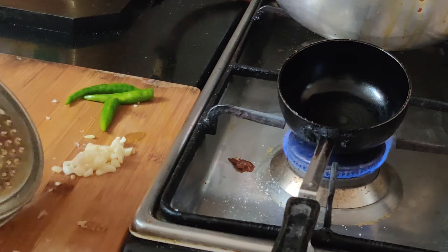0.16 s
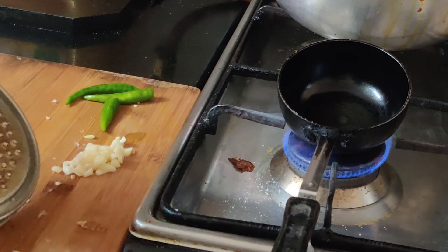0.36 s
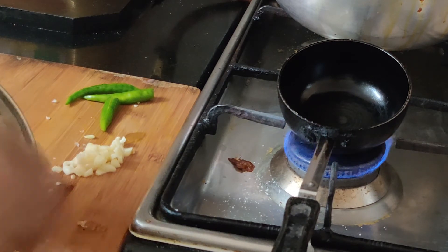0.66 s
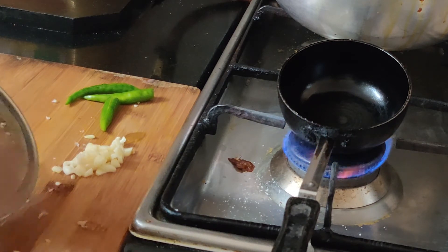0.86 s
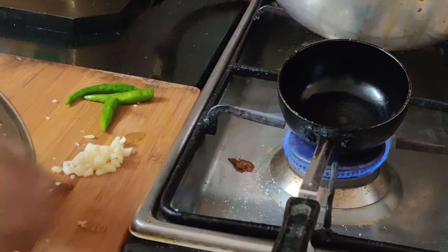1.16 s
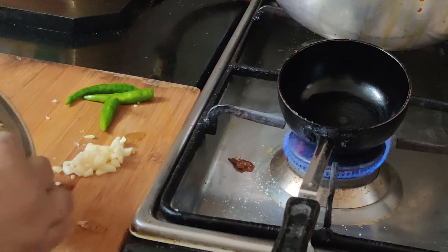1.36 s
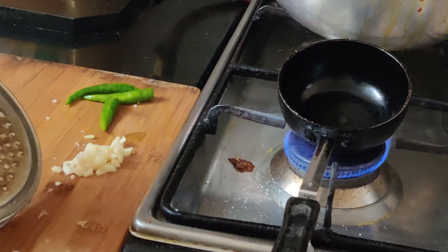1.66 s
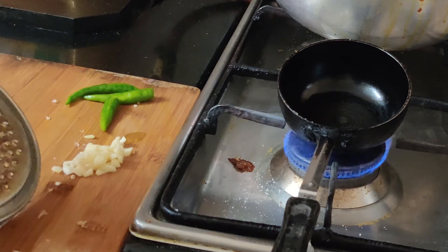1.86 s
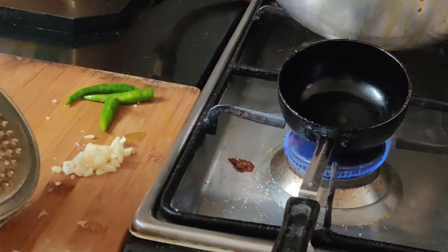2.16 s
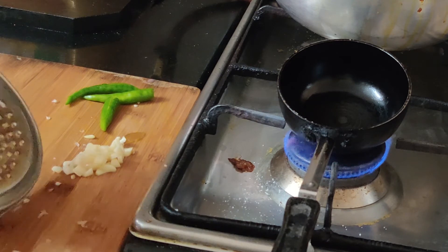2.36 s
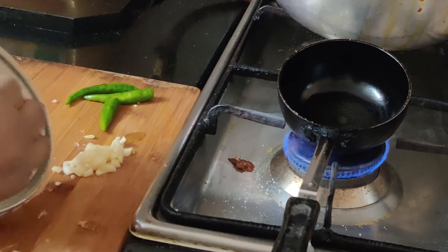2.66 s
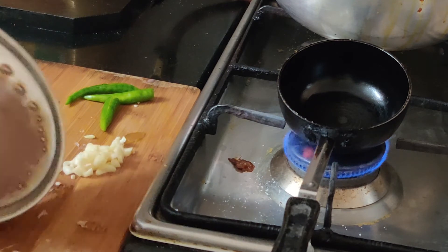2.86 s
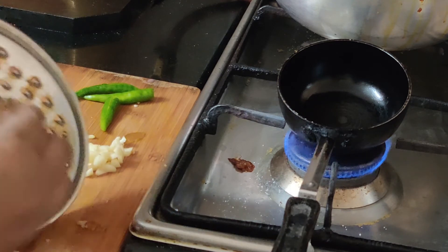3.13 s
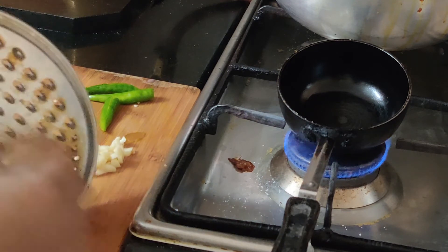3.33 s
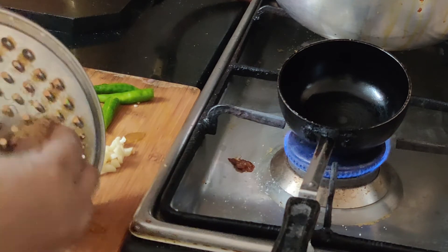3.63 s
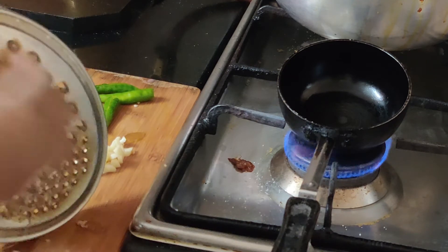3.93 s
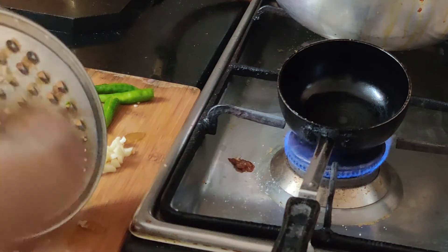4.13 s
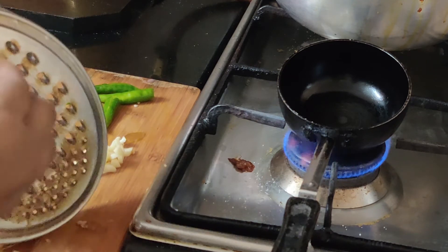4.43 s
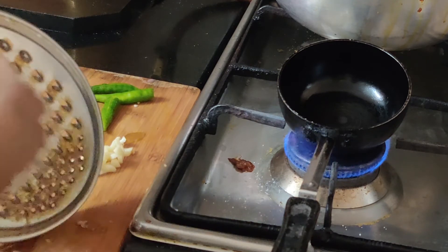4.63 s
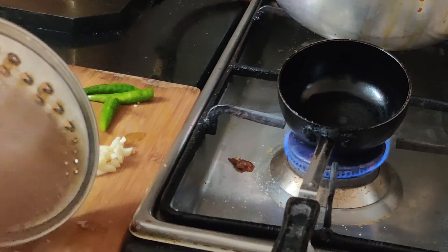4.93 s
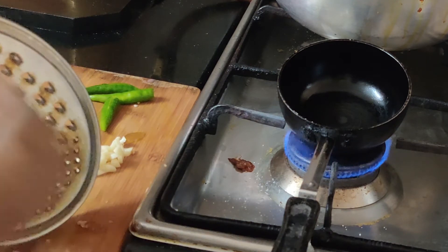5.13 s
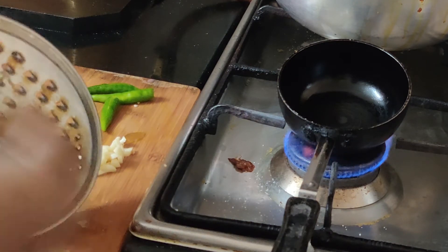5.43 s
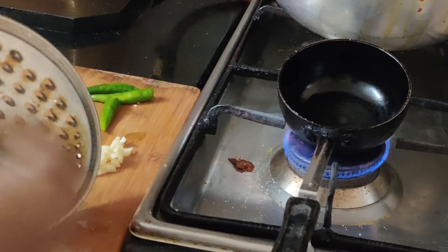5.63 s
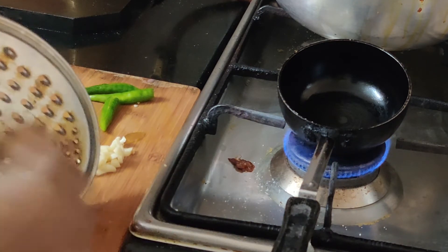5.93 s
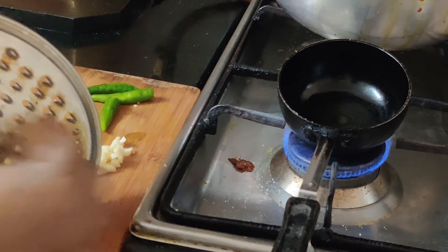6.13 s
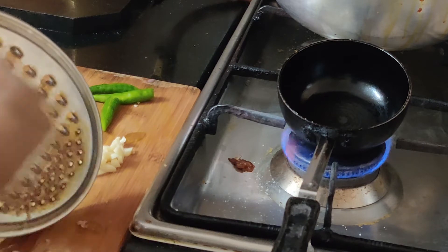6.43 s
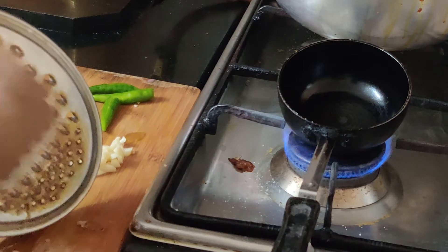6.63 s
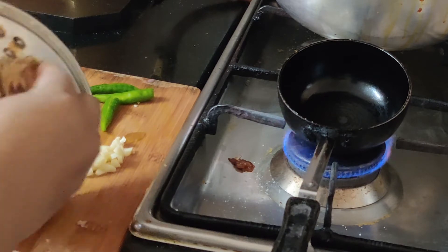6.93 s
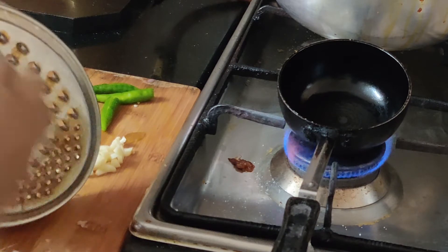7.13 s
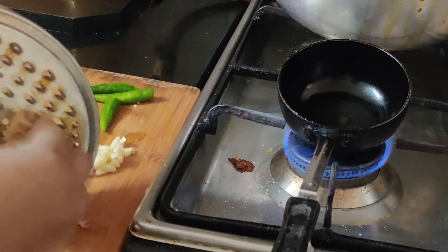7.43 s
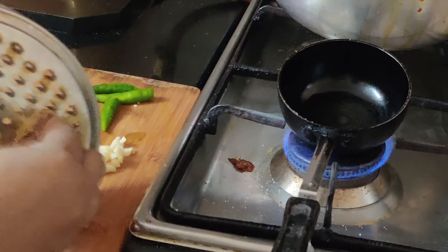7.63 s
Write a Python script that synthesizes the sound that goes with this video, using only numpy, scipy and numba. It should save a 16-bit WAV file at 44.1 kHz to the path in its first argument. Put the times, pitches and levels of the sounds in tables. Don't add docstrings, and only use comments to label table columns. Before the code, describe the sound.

Steam blasts steadily from a pressure cooker in a small tiled kitchen, heard close in stereo. The hiss is dense, bright and sharp, with a breathy whistle near 5 kHz leaning left and wandering slightly in pitch. It is already going at the start and never stops. A gas flame rumbles very faintly underneath.

```python
import sys
import numpy as np
from scipy import signal
from scipy.fft import rfft, irfft, next_fast_len
from scipy.io import wavfile
from scipy.ndimage import uniform_filter1d
from numba import njit

SR = 44100
rng = np.random.default_rng(int(sys.argv[2]) if len(sys.argv) > 2 else 0)


def decibels_to_gain(level_db):
    exponent = np.asarray(level_db, float) / 20
    return 10 ** exponent


def log_audio(samples):
    frames = np.atleast_2d(samples).T
    limited = np.clip(frames, -1, 1)
    pcm = np.round(limited * 32767).astype(np.int16)
    wavfile.write(sys.argv[1], SR, pcm)


N = 343539
SIZE = next_fast_len(N + SR)
HZ = np.arange(SIZE // 2 + 1) * SR / SIZE


def cooker():
    # frequency in Hz, level in dB per Hz.
    left_hiss = [(900, -27.2), (1500, -21.4), (2200, -17.3), (3000, -10.6), (3700, -5.5), (4200, -5.9),
                 (6200, -9.2), (7000, -8.2), (8000, -6.7), (9500, -7.9), (11000, -11.3), (13000, -17.4),
                 (14500, -15.8), (15700, -12.7)]
    right_hiss = [(900, -25.4), (1500, -22.5), (2200, -18.9), (3200, -11.8), (4100, -11.0), (5000, -3.7),
                  (6000, 0.9), (7200, -1.5), (8700, -1.6), (10000, -3.1), (11200, -10.4), (13200, -16.2),
                  (14500, -12.7), (15700, -9.5)]
    # frequency in Hz, width in Hz, level in dB.
    left_rings = [(3714, 26, 3.8), (4408, 66, 3.9), (4613, 22, 3.0), (4699, 20, 3.0), (4774, 17, 2.0),
                  (4807, 20, 1.8), (4871, 20, 2.9), (5038, 74, 3.2), (5130, 31, 5.1), (5205, 42, 1.6),
                  (5334, 16, 1.7), (5469, 47, 5.8), (5512, 13, 2.9), (5539, 20, 2.9), (5679, 43, 2.4),
                  (6486, 25, 3.7), (7725, 60, 3.8), (7865, 20, 3.8), (7940, 15, 3.3), (7988, 23, 3.6),
                  (8058, 20, 2.9), (8613, 34, 2.7), (8683, 18, 3.1), (8936, 35, 3.5)]
    right_rings = [(4984, 12, 3.0), (5022, 79, 4.0), (5092, 43, 2.9), (5264, 61, 3.2), (5485, 55, 2.8),
                   (5609, 31, 4.0), (5792, 20, 3.7), (5840, 26, 3.0), (6072, 40, 5.8), (6163, 66, 6.6),
                   (6438, 39, 6.5), (6486, 28, 4.4), (6556, 15, 3.2), (6653, 35, 3.1), (6739, 34, 4.8),
                   (6804, 29, 3.7), (7380, 83, 3.3), (7423, 28, 2.9), (7633, 25, 3.8), (7665, 13, 3.5),
                   (8301, 28, 4.1), (8704, 95, 5.0), (8947, 20, 3.5), (8984, 59, 3.8)]
    hiss_port_db, whistle_port_db = (2.3, 6.2), (4.5, -18)
    haze_db = -8

    hiss_db, whistle_db, whistle_hz, spray_db, rush_db, width_hz = flow()
    bands = flicker(spray_db - np.mean(spray_db), rush_db - np.mean(rush_db))
    tone = np.array([colour(left_hiss), colour(right_hiss)])
    ring = np.array([rings(left_rings), rings(right_rings)])

    smooth = decibels_to_gain(haze_db) * np.sqrt(1 + (HZ / 13000) ** 4)
    haze = [smooth * np.array([[1], [0]]), smooth * np.array([[0], [1]])]
    ring = ring / np.sqrt(1 + smooth ** 2)
    paths = [kitchen(), kitchen(), kitchen()] + haze

    shades = decibels_to_gain([2.5 * walk(.5), 2.5 * walk(.5), 2.5 * walk(.5)])
    shades = list(shades / np.sqrt(np.sum(shades ** 2, axis=0))) + [1, 1]

    hiss, whistle = 0, 0
    for shade, path in zip(shades, paths):
        jet = turbulence(bands)
        sung = vent_cavity(jet, whistle_hz, width_hz) * decibels_to_gain(hiss_db + whistle_db)
        hiss_spectrum = rfft(jet * decibels_to_gain(hiss_db), SIZE) * tone
        hiss = hiss + shade * irfft(hiss_spectrum * ring * path, SIZE)[:, :N]
        whistle = whistle + shade * irfft(rfft(sung, SIZE) * ring * path, SIZE)[:, :N]

    ports = []
    for port in (0, 1):
        hiss_part = decibels_to_gain(hiss_port_db[port]) * unit(hiss[port])
        whistle_part = decibels_to_gain(whistle_port_db[port]) * unit(whistle[port])
        ports.append(hiss_part + whistle_part)
    return decibels_to_gain(np.mean(hiss_db)) * np.array(ports)


def flow():
    # time in seconds, hiss level in dB, whistle frequency in Hz.
    flow_points = [(0.0, -20, 4900), (1.69, -20, 4850), (1.71, -21, 4864), (2.93, -19.5, 4955),
                   (3.12, -18, 4810), (3.21, -20.5, 4960), (3.34, -19.5, 4900), (3.97, -20, 5010),
                   (5.27, -19.5, 4920), (5.34, -20, 4970), (6.03, -21, 4940), (6.14, -21, 4900),
                   (6.2, -20, 4950), (7.79, -20, 4923)]
    t = np.arange(N) / SR
    s, hiss_db, whistle_hz = np.transpose(flow_points)

    widest_s, widest_hz, spread_hz_per_s, focus_hz_per_s = 3.9, 580, 27, 53
    narrowing_hz_per_s = np.where(t < widest_s, spread_hz_per_s, focus_hz_per_s)
    width_hz = widest_hz - narrowing_hz_per_s * np.abs(t - widest_s)
    whistle_db = 1.76 * (widest_hz - width_hz) / 100

    spray_fade_db_per_s, rush_extra_db, rush_settle_s = 0.18, 3.5, 1.4
    spray_db = -spray_fade_db_per_s * t
    rush_db = rush_extra_db * np.exp(-t / rush_settle_s)
    return np.interp(t, s, hiss_db), whistle_db, np.interp(t, s, whistle_hz), spray_db, rush_db, width_hz


def flicker(spray_db, rush_db):
    swell_db = .55 * walk(8)
    edges_hz = (0, 1500, 2400, 4300, 6000, 8000, 11000, 13500, SR)
    own_db = [1.2 * walk(6), 1.2 * walk(6), rush_db + .8 * walk(5), 0, 0, 0,
              spray_db + .9 * walk(10), spray_db + .9 * walk(10)]
    bands = []
    for lo_hz, hi_hz, db in zip(edges_hz[:-1], edges_hz[1:], own_db):
        bands.append((lo_hz, hi_hz, decibels_to_gain(swell_db + db + .5 * walk(14))))
    return bands


def turbulence(bands):
    noise = rfft(rng.standard_normal(SIZE))
    jet = 0
    for lo_hz, hi_hz, gain in bands:
        inside = (HZ >= lo_hz) & (HZ < hi_hz)
        jet = jet + gain * irfft(noise * inside, SIZE)[:N]
    return jet


def vent_cavity(jet, hz, width_hz):
    core_hz = 4945 + 1.3 * (hz - 4945)
    core_width_hz = 1.15 * width_hz
    core = svf(svf(jet, core_hz, core_width_hz), core_hz, core_width_hz)
    core = core * np.sqrt(500 / width_hz)
    shoulder_hz, shoulder_width_hz = 1.02 * hz, 0.33 * hz
    shoulder = svf(svf(jet, shoulder_hz, shoulder_width_hz), shoulder_hz, shoulder_width_hz)
    return core + 0.26 * shoulder


@njit
def svf(x, hz, width):
    y, band, low = np.empty(len(x)), 0., 0.
    for i in range(len(x)):
        g = np.tan(np.pi * hz[i] / SR)
        k = width[i] / hz[i]
        v = (band + g * (x[i] - low)) / (1 + g * (g + k))
        band = 2 * v - band
        low = low + 2 * g * v
        y[i] = k * v
    return y


def kitchen():
    t60_s, echo_db = .45, 2
    left_lag = 8.02
    t = np.arange(SR // 2) / SR
    decay = np.exp(-np.log(1000) * t / t60_s) * (t > .004)
    tail = rng.standard_normal((2, len(t))) * decay
    tail = decibels_to_gain(echo_db) * tail / np.sqrt(np.sum(tail ** 2, axis=1, keepdims=True))
    direct = np.exp(-2j * np.pi * HZ / SR * np.array([[left_lag], [0]]))
    return (direct + rfft(tail, SIZE)) / np.sqrt(1 + decibels_to_gain(echo_db) ** 2)


def burner():
    # frequency in Hz, level in dB per Hz.
    burner_curve = [(25, -0.5), (48, 2), (70, -1), (200, -0.5), (500, -1), (900, -6)]
    port_db = (-0.5, 2)
    left, other = rfft(rng.standard_normal((2, SIZE)))
    alike = 0.54 / (1 + (HZ / 60) ** 2)
    pair = np.array([left, alike * left + np.sqrt(1 - alike ** 2) * other])
    roar = irfft(pair * colour(burner_curve) / (1 + (HZ / 1500) ** 4), SIZE)[:, :N]
    flame_db = flame()
    ports = []
    for port in (0, 1):
        flutter_db = 0.58 * walk(15) + 1.25 * walk(80)
        ports.append(decibels_to_gain(port_db[port] + flame_db + flutter_db) * unit(roar[port]))
    return np.array(ports)


def flame():
    start_db, turn_s, turn_length_s, turn_db, sink_db_per_s = -49, 2.3, 0.36, 1.76, 0.15
    since_s = np.arange(N) / SR - turn_s
    turned = np.clip(since_s / turn_length_s + .5, 0, 1)
    return start_db + turned * (turn_db - sink_db_per_s * since_s)


def unit(x):
    return x / np.sqrt(np.mean(x ** 2))


def colour(table):
    hz, db = np.transpose(table)
    gain = decibels_to_gain(np.interp(np.log(HZ + 1), np.log(hz), db))
    return gain * np.minimum(HZ / hz[0], 1) ** 2


def rings(table):
    return decibels_to_gain(sum(db / (1 + (2 * (HZ - hz) / width) ** 2) for hz, width, db in table))


def walk(rate_hz):
    k = int(SR / rate_hz)
    held = np.repeat(rng.standard_normal(N // k + 1), k)
    return 1.3 * uniform_filter1d(uniform_filter1d(held, k), k)[:N]


def scene():
    return cooker() + burner()


def low_pass(x):
    return signal.sosfilt(signal.butter(12, 15795, fs=SR, output="sos"), x)


def record(dry):
    top_hz = 15735
    rounded = 1.278 * np.tanh(dry / 1.094)
    cut = irfft(rfft(rounded, SIZE) * (HZ < top_hz), SIZE)[:, :N]
    return low_pass(cut)


dry = scene()
out = record(dry)
log_audio(out)
```